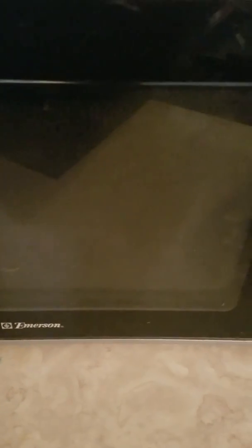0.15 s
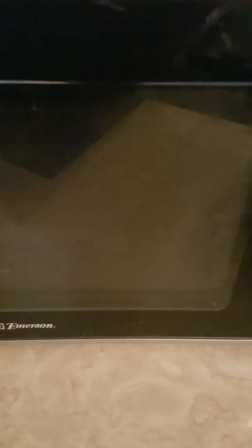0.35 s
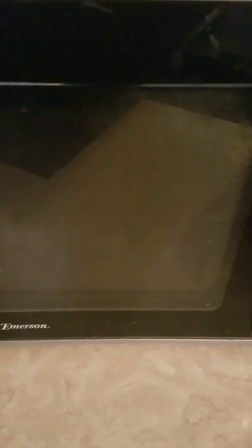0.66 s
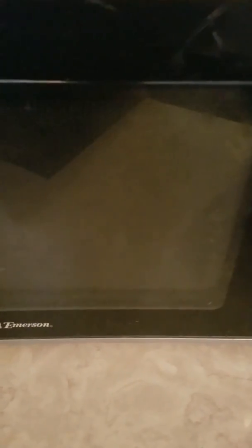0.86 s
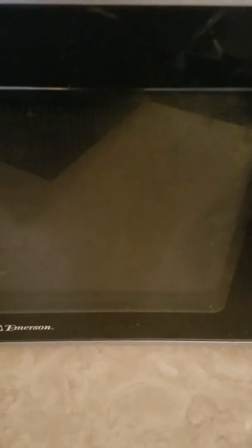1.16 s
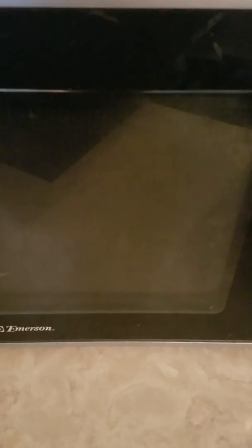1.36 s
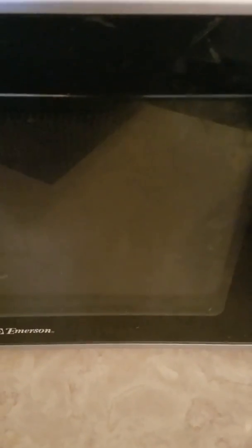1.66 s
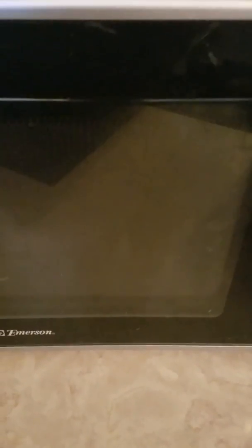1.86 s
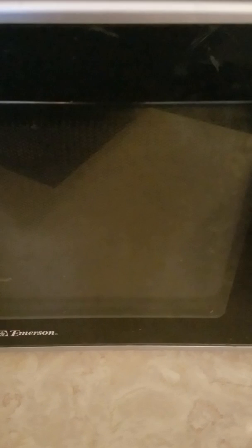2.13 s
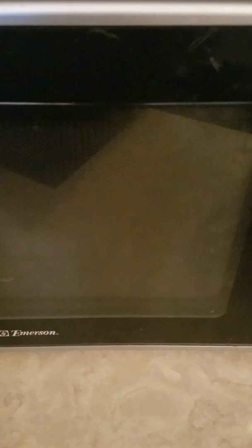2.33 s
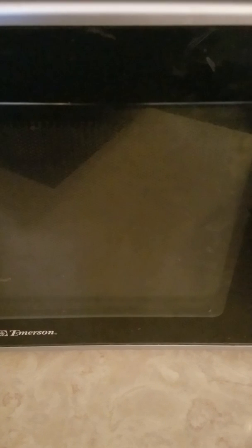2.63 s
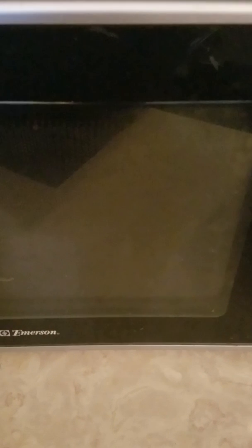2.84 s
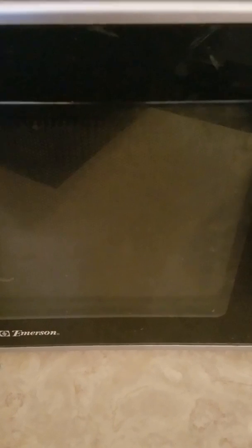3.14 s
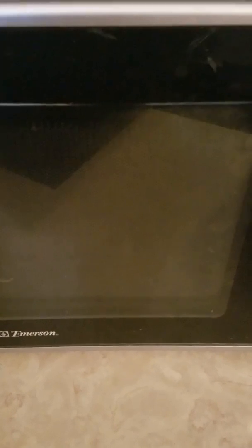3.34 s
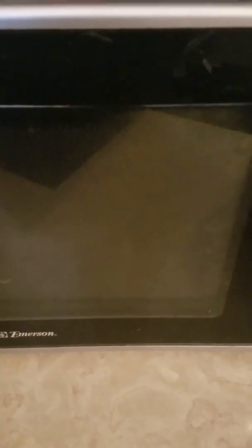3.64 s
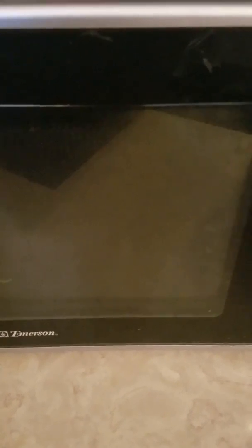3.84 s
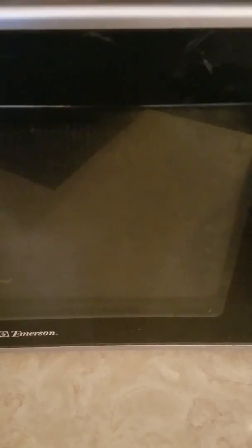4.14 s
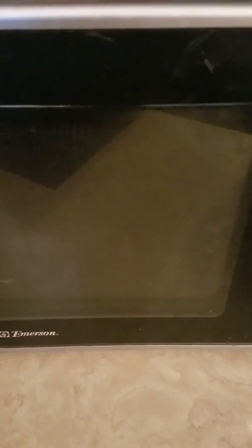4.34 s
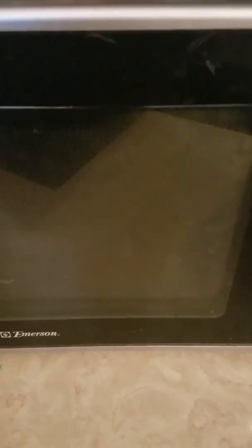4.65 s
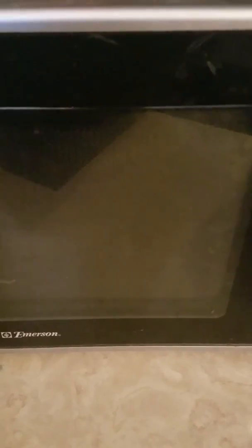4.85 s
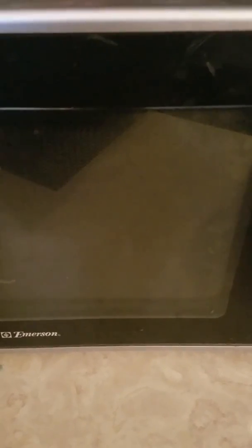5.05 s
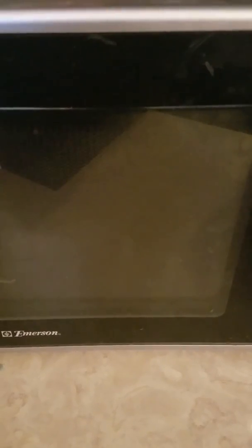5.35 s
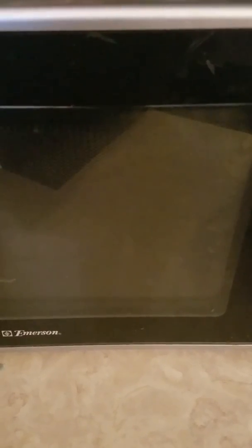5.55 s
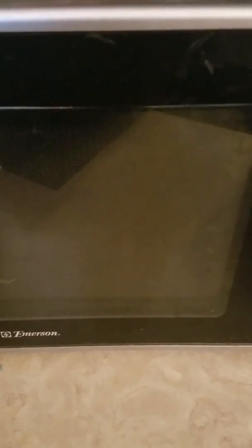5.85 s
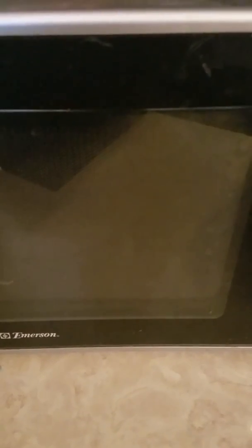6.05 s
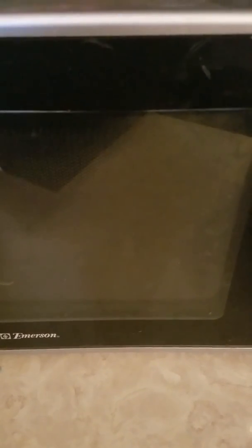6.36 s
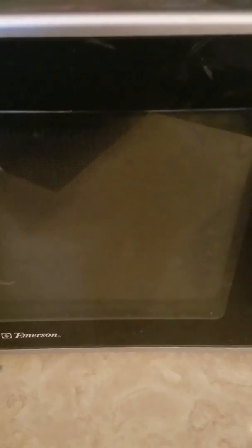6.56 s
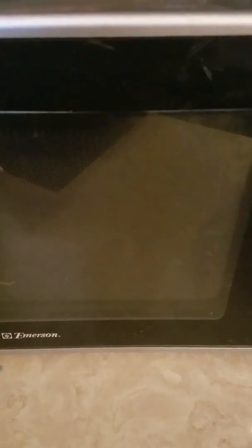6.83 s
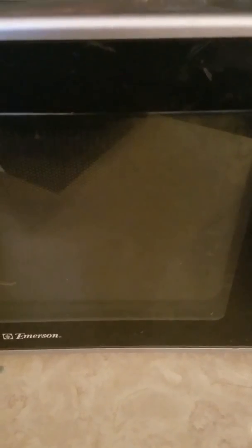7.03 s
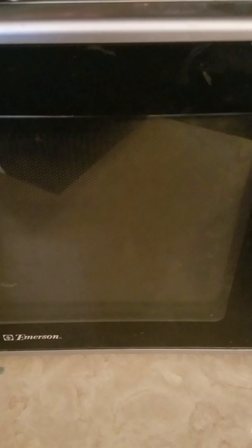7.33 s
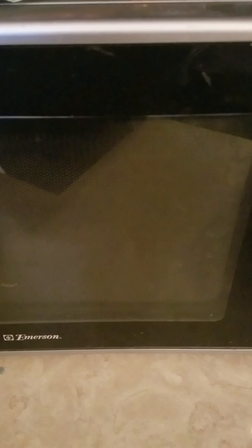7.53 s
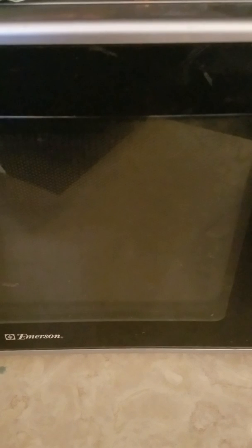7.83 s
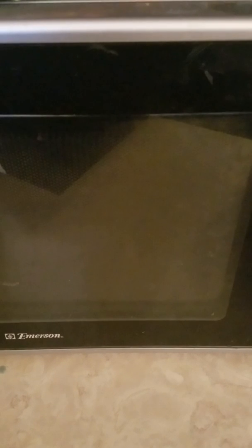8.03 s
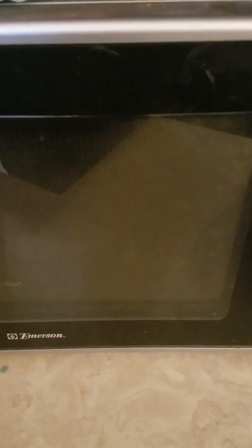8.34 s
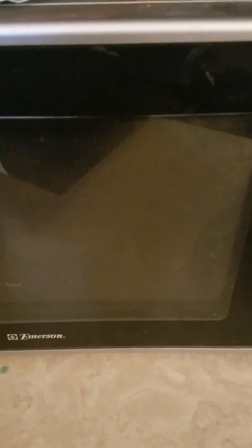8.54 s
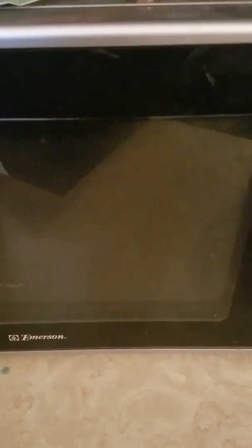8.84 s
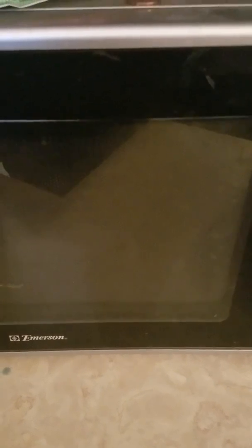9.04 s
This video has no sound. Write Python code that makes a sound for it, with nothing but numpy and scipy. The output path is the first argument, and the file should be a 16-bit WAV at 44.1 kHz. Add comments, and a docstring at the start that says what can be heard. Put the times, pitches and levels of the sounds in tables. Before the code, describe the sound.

Close up on a kitchen counter, a microwave hums and buzzes steadily while its fan pushes air through the vents. The sound starts a little thin and becomes fuller after two seconds. The load inside bumps the metal interior twice, first lightly near the start, then harder and deeper near the end, each bump trailed by faint rubbing from the turntable.

```python
"""A kitchen counter, just in front of the door of a running microwave oven.
The transformer hums and buzzes on the mains while a four-bladed fan settles to speed and pushes air
through the vents. Once a turn, the load on the turntable bumps, chatters and scrapes in the steel
cavity. A fridge drones faintly behind. The bass starts thin and fills out after two seconds."""
import sys
import numpy as np
from scipy import signal
from scipy.fft import rfft, irfft
from scipy.io import wavfile
from scipy.ndimage import map_coordinates

SR = 44100
rng = np.random.default_rng(int(sys.argv[2]) if len(sys.argv) > 2 else 0)


def digitize_waveform(pressure):
    """Quantize a signal to 16-bit integers and store it at the path in sys.argv[1].

    Rows of a 2-D input are taken as channels; values are limited to [-1, 1].
    """
    field = np.atleast_2d(pressure).T
    bounded = np.clip(field, -1, 1)
    quanta = np.round(bounded * 32767).astype(np.int16)
    wavfile.write(sys.argv[1], SR, quanta)


N = 405279
TIME = np.arange(N) / SR
FREQS = np.maximum(np.fft.rfftfreq(N, 1 / SR), 1)
MAINS_HZ = 59.974
MAINS_PHASE = 2 * np.pi * MAINS_HZ * TIME

# The load bumps the cavity once a turn; the lighter bump is brighter and dies sooner:
# start_s, gain_db, tilt_db_per_octave, loss_per_rebound_db
BUMPS = [(0.898, -7, 1.2, 5), (7.614, 1.5, -0.8, 2)]


def undb(db):
    """Decibels to gain."""
    return 10 ** (np.asarray(db) / 20)


def spectrum(rows, freqs=FREQS, column=1):
    """One column of a table, drawn as a curve over log frequency."""
    rows = np.array(rows, float)
    return np.interp(np.log(freqs), np.log(rows[:, 0]), rows[:, column])


def colour(noise, db):
    """Shape white noise of unit power to a spectrum in dB per Hz."""
    return irfft(rfft(noise) * undb(db) * np.sqrt(SR / 2), N)


def wander(rate_hz):
    """Smooth random drift with a spread of about one."""
    points = rng.standard_normal(1024)
    return 1.3 * map_coordinates(points, [TIME * rate_hz], order=3, mode="wrap")


def decay(age, t60):
    """A fall of 60 dB in t60 seconds."""
    return np.exp(-np.log(1000) * age / t60)


def swell(peak_s, width_s):
    """A smooth rise and fall around one moment."""
    return np.exp(-((TIME - peak_s) / width_s) ** 2)


def tone(phase, left_db, right_db, left_lead=0):
    """One partial, as the kitchen's standing waves bring it to each side."""
    phase = phase + rng.uniform(0, 2 * np.pi)
    left = undb(left_db) * np.sin(phase + left_lead)
    right = undb(right_db) * np.sin(phase)
    return np.sqrt(2) * np.array([left, right])


def transformer_hum(waver_db=0.5, trim_db=-0.2):
    """The core flexes with the mains and drives the casing at its harmonics."""
    # Hum partials: mains_multiple, left_db, right_db, left_lead_rad
    partials = [(1, -56, -66, -1.2), (2, -32, -35, -0.7), (3, -51, -50, -0.3), (4, -42, -45, -0.9),
                (5, -54, -59, 0.2), (6, -50, -55, 0.4), (7, -62, -62, -0.2), (8, -65, -68, 0.7),
                (10, -62, -70, 0.8), (12, -61, -57, 0.6), (13, -62, -62, -0.1), (19, -70, -79, 0.4),
                (28, -66, -78, -1.0), (30, -63, -77, -2.4), (32, -69, -70, -2.3), (34, -79, -70, -1.8),
                (59, -77, -91, -1.2), (65, -78, -83, 2.1), (71, -89, -85, 0.8), (77, -83, -89, -0.2)]
    level = undb(trim_db + waver_db * wander(2.9))
    return level * sum(tone(k * MAINS_PHASE, *stereo) for k, *stereo in partials)


def fan_shaft(running_hz=44.57, shortfall_hz=1.1, settle_s=0.72, wobble=0.0012):
    """Angle of the shaft, which starts a little slow and settles to a slightly uneven speed."""
    speed_hz = running_hz - shortfall_hz * np.exp(-TIME / settle_s)
    return 2 * np.pi * np.cumsum(speed_hz * (1 + wobble * wander(9))) / SR


def fan_blades(angle, blade_flutter_db=0.43, overtone_flutter_db=2):
    """Four blades pass just under the third mains harmonic and beat slowly against the hum."""
    # Fan partials: shaft_multiple, left_db, right_db, left_lead_rad
    partials = [(3, -47, -49, -0.7), (4, -28, -27, -0.4), (5, -60, -55, -0.0), (6, -65, -66, 1.0),
                (7, -59, -55, -0.9), (8, -42, -53, -1.6), (12, -61, -66, 0.4), (15, -62, -64, 0.5),
                (16, -59, -61, 0.7), (18, -71, -61, 0.8), (20, -60, -66, 0.7), (33, -64, -70, 0)]
    out = 0
    for k, *stereo in partials:
        # turbulent inflow shakes the other partials more than the blade rate itself
        flutter_db = blade_flutter_db if k == 4 else overtone_flutter_db
        out += tone(k * angle, *stereo) * undb(flutter_db * wander(8))
    return out


def vent_air(angle, flicker_db=0.43, chop=0.056):
    """Turbulence coloured by the vents, centred in the bass and wide in the treble."""
    # Rush of the cooling air: freq_hz, left_db_per_hz, right_db_per_hz
    rush = [(22, -91, -98), (50.6, -75.5, -75.5), (104, -68, -69.5), (171, -60.5, -57), (220, -71, -66.5),
            (293, -68, -68.5), (468, -76, -77), (654, -73, -74), (960, -79, -81.5), (2060, -79.5, -83.5),
            (3340, -92, -93), (5900, -102, -105), (9150, -108, -111), (15000, -106, -111)]
    # Peaks and dips that the vents and casing add: centre_hz, width_hz, left_db, right_db
    resonances = [(386, 17, 1, -5), (493, 21, -2.5, -5), (540, 34, 5, 0), (651, 54, 4, 1.5),
                  (720, 48, 5.5, 3), (777.5, 44, 3.5, 8), (832, 54, -11, 3.5), (884, 28, 7, 3),
                  (1035, 47, -3, 5.5), (1235, 130, 4.5, 0), (1308, 48, -7.5, 1), (1448, 89, 7, 2),
                  (2088, 120, 3, 5.5), (2370, 70, -2.5, -1.5), (2630, 260, 0, 6), (3800, 350, -1.5, -3),
                  (4320, 130, 5.5, 1.5), (4750, 300, 3, 2), (7950, 390, -2, 5.5), (9200, 570, -3.5, -2)]
    # Likeness of the rush at left and right: freq_hz, correlation
    correlation = [(60, 0.95), (150, .92), (300, 0.75), (650, 0.54), (1000, 0.2), (1500, 0.17),
                   (4000, 0.042)]
    likeness = spectrum(correlation)
    centre = rfft(rng.standard_normal(N))
    sides = rfft(rng.standard_normal((2, N)))
    noise = irfft(np.sqrt(likeness) * centre + np.sqrt(1 - likeness) * sides, N)
    noise *= 1 + chop * (np.cos(angle) + np.sin(2 * angle))  # unequal blades chop the stream
    shape_db = np.array([spectrum(rush, column=1), spectrum(rush, column=2)])
    for hz, width_hz, left_db, right_db in resonances:
        bell = np.exp(-2 * ((FREQS - hz) / width_hz) ** 2)
        shape_db += np.outer([left_db, right_db], bell)
    return colour(noise, shape_db) * undb(flicker_db * wander(12))


def rebounds(start_s, db, loss_db, count=8, first_gap_s=0.008, gap_growth=1.28):
    """The load chatters against the wall in ever weaker, slower blows: start_s, gain_db."""
    gaps = first_gap_s * gap_growth ** np.arange(count - 1)
    delays = np.append(0, np.cumsum(gaps))
    return [(start_s + delay, db - k * loss_db) for k, delay in enumerate(delays)]


def load_knocks(crack_t60=0.068, room_t60=0.25, room_db=-11, ring_db=-1, right_db=-3):
    """Each blow rings the steel cavity over a short clatter that lingers in the kitchen."""
    # Modes of the cavity: pitch_hz, level_db, t60_s
    modes = [(382.4, -37, .35), (587, -33, 0.096), (714, -29.5, 0.18), (807, -41.5, 0.25),
             (1048, -37, 0.17), (1155, -39, 0.17), (1370, -36.5, 0.11), (1650, -50.5, 0.2), (2004, -47, .2),
             (2600, -56, 0.28)]
    # Dense clatter of the panels: freq_hz, level_db_per_hz
    panels = [(40, -68.5), (200, -57), (480, -62.5), (720, -56.5), (1000, -63), (1350, -63), (2200, -68),
              (3500, -81), (6000, -108.5), (12000, -112)]
    out = np.zeros((2, N))
    for bump_s, bump_db, tilt, loss_db in BUMPS:
        clatter = np.zeros((2, N))
        for start_s, blow_db in rebounds(bump_s, bump_db, loss_db):
            onset = int(start_s * SR)
            span = slice(onset, onset + SR)
            age = TIME[span] - TIME[onset]
            for hz, mode_db, t60 in modes:
                phase = rng.uniform(0, 2 * np.pi) + rng.uniform(-0.82, 1, (2, 1))  # offset per side
                gain = undb(blow_db + ring_db + mode_db + tilt * np.log2(hz / 1000))
                envelope = (1 - np.exp(-age * hz)) * decay(age, t60)
                out[:, span] += gain * envelope * np.sin(2 * np.pi * hz * age + phase)
            tail = decay(age, crack_t60) + undb(room_db) * decay(age, room_t60)
            clatter[:, span] += undb(blow_db) * tail * rng.standard_normal((2, len(age)))
        out += colour(clatter, spectrum(panels) + tilt * np.log2(FREQS / 1000))
    return out * undb([[0], [right_db]])


def wall_booms(pitch_hz=104.2, gain_db=-10.5, rise_s=0.03, t60=0.31, right_db=-3):
    """After each bump the broad cavity wall takes a few cycles to swing up, then dies away."""
    out = 0
    for start_s, bump_db, *_ in BUMPS:
        age = np.maximum(TIME - start_s, 0)
        envelope = (1 - np.exp(-(age / rise_s) ** 2)) * decay(age, t60)
        out += undb(bump_db + gain_db) * envelope * np.sin(2 * np.pi * pitch_hz * age)
    return out * undb([[0], [right_db]])


def turntable_scrapes(delay_s=0.52, gap_s=0.14, width_s=0.09, second_db=-4, right_db=-2):
    """The turntable rubs unevenly twice after each bump, the second time more faintly."""
    # Colour of the rubbing: freq_hz, level_db_per_hz
    friction = [(30, -85), (55, -68), (120, -82.5), (1500, -91), (3000, -86.5), (4500, -96), (6000, -104),
                (10000, -114), (14000, -126)]
    contact = 0
    for start_s, bump_db, *_ in BUMPS:
        peak_s = start_s + delay_s
        rubs = swell(peak_s, width_s) + undb(second_db) * swell(peak_s + gap_s, width_s)
        contact += undb(0.35 * bump_db) * rubs  # a harder bump rubs a little louder
    rubbing = rng.standard_normal((2, N)) * contact * undb(wander(70))
    return colour(rubbing, spectrum(friction)) * undb([[0], [right_db]])


def mains_buzz(right_db=-7):
    """The same fine electrical rattle repeats on every mains cycle."""
    # Colour of the buzz: freq_hz, level_db_per_hz
    rattle = [(900, -105), (1800, -91), (3000, -104), (5000, -104), (6500, -108), (9000, -117),
              (12000, -117), (13500, -109), (15500, -109)]
    period = round(SR / MAINS_HZ)
    cycle = rng.standard_normal((2, period))
    looped = cycle[:, np.arange(N) % period]
    return colour(looped, spectrum(rattle)) * undb([[0], [right_db]])


def motor_whine(angle, right_db=-4):
    """The turning rotor modulates the magnetic pull, giving sum and difference tones."""
    # Whine partials: mains_multiple, shaft_multiple, level_db
    sidebands = [(2, 5, -57.5), (2, 10, -63), (4, 1, -56.5), (4, 2, -63), (6, -6, -55.5), (6, 5, -69),
                 (6, 6, -65)]
    return sum(tone(m * MAINS_PHASE + k * angle, db, db + right_db) for m, k, db in sidebands)


def brief_ring(peak_s=5.66, width_s=0.16, pitch_hz=525, level_db=-50):
    """A faint tone swells out of the rush for a moment."""
    return tone(2 * np.pi * pitch_hz * TIME, level_db, level_db) * swell(peak_s, width_s)


def fridge_drone(pitch_hz=58.9):
    """A compressor elsewhere in the kitchen beats against the mains hum about once a second."""
    return tone(2 * np.pi * pitch_hz * TIME, left_db=-61, right_db=-69)


def scene():
    """The running oven, its turning load and the fridge behind."""
    angle = fan_shaft()
    electrics = transformer_hum() + mains_buzz()
    cooling = fan_blades(angle) + motor_whine(angle) + vent_air(angle) + brief_ring()
    load = load_knocks() + wall_booms() + turntable_scrapes()
    return electrics + cooling + load + fridge_drone()


def record(dry, opens_s=1.954, ramp_s=0.44, fade_s=0.003, top_hz=15750):
    """A low shelf holds the bass thin, then opens; the ends fade and the top is cut steeply."""
    # Shape of the shelf, scaling the ramp's decibels: freq_hz, weight
    shelf = [(55, 1.3), (120, 1.24), (180, 1.21), (240, 0.77), (330, 0.15), (480, 0.018)]
    freqs, times, frames = signal.stft(dry, SR, nperseg=2048)
    ramp_db = np.interp(times, [opens_s, opens_s + ramp_s], [-9.5, 0.2])  # thin to full
    shelf_db = np.outer(spectrum(shelf, np.maximum(freqs, 1)), ramp_db)
    _, shelved = signal.istft(frames * undb(shelf_db), SR, nperseg=2048)
    edge_s = np.minimum(TIME, TIME[::-1])
    fade = np.sin(np.pi / 2 * np.minimum(edge_s / fade_s, 1)) ** 2
    lowpass = signal.ellip(12, 0.1, 80, top_hz, fs=SR, output="sos")
    return signal.sosfilt(lowpass, shelved[:, :N] * fade)


dry = scene()
out = record(dry)
digitize_waveform(out)
```